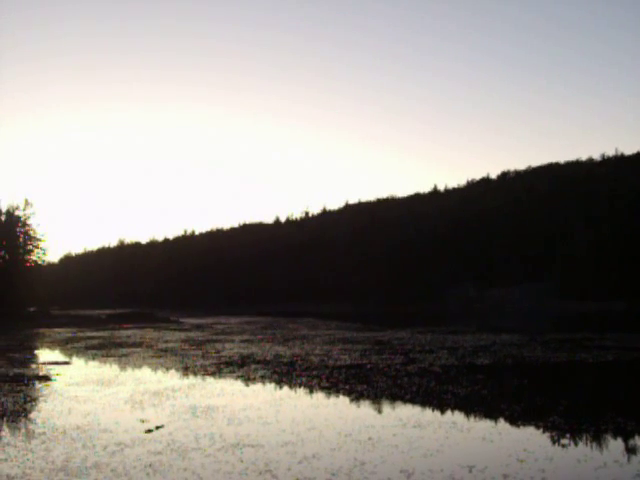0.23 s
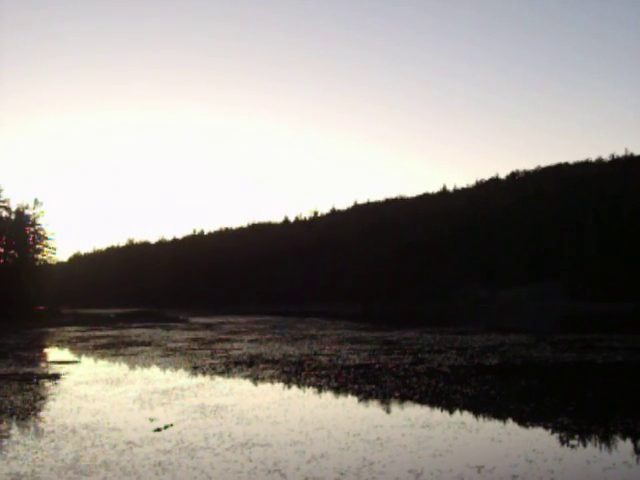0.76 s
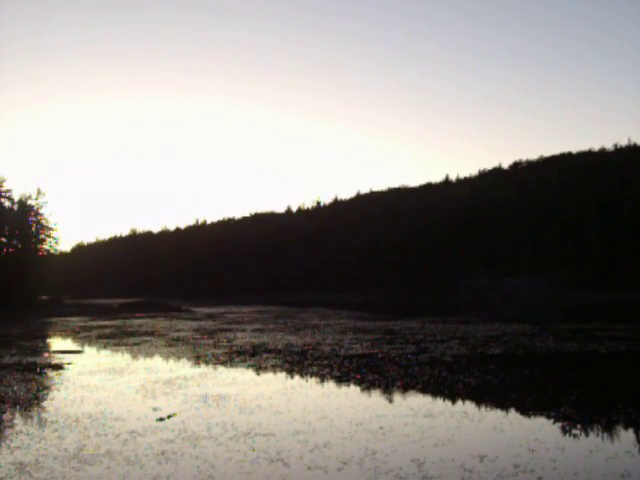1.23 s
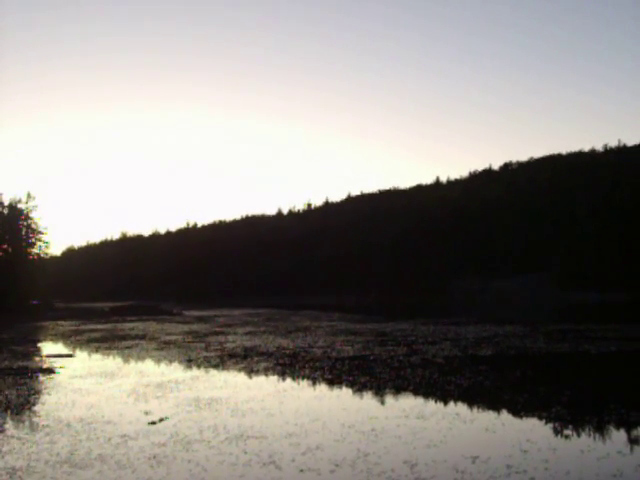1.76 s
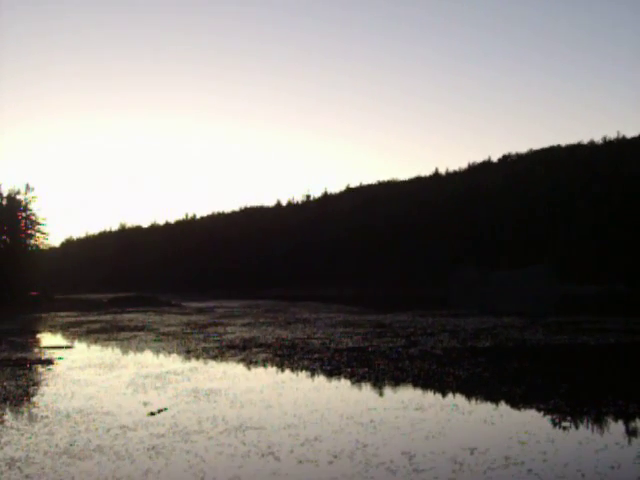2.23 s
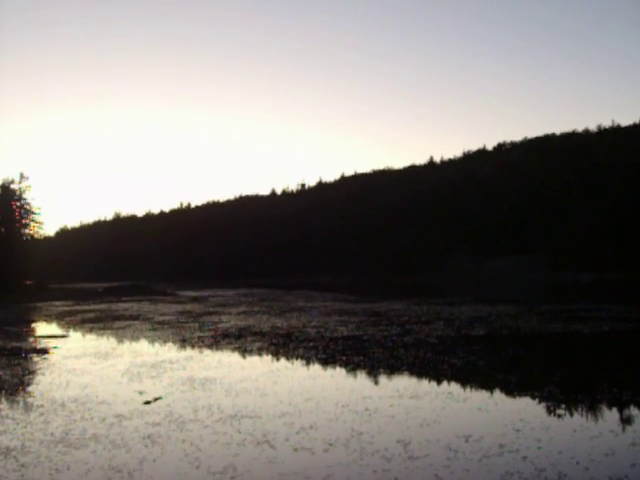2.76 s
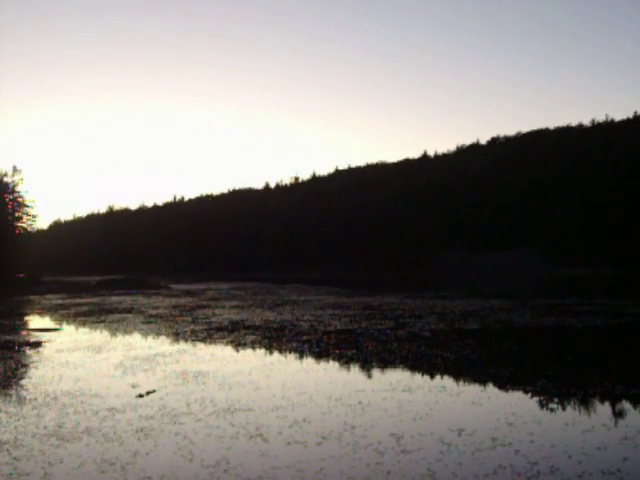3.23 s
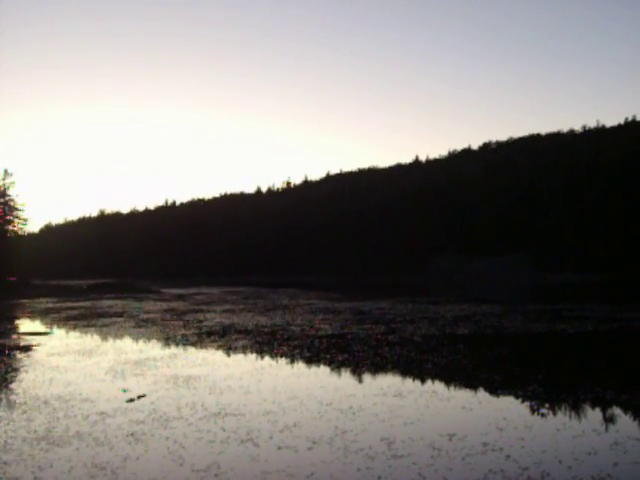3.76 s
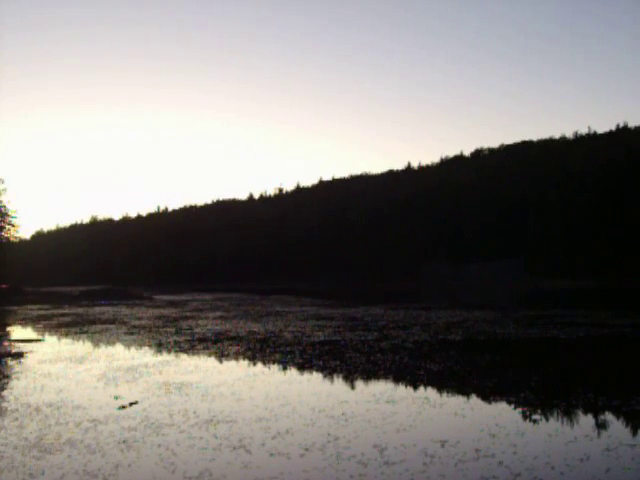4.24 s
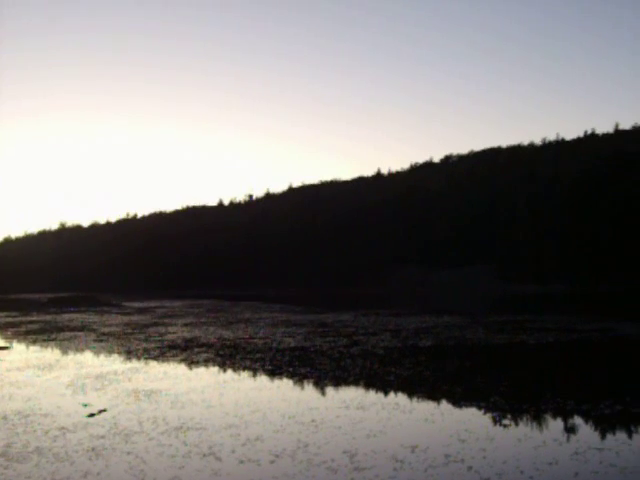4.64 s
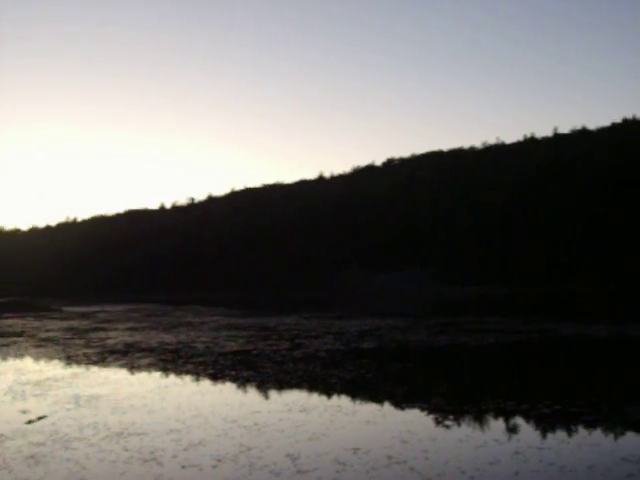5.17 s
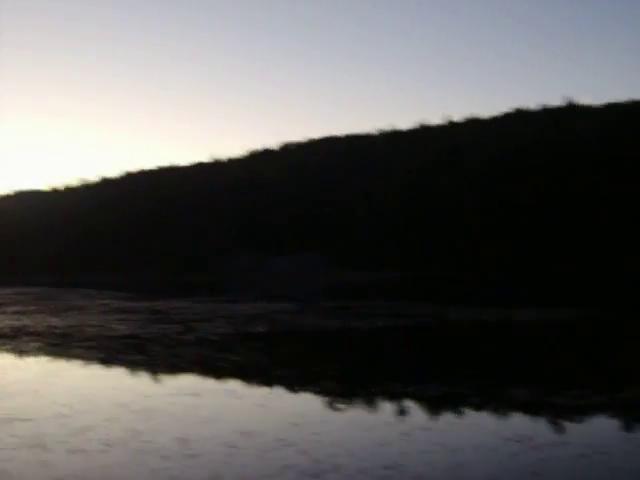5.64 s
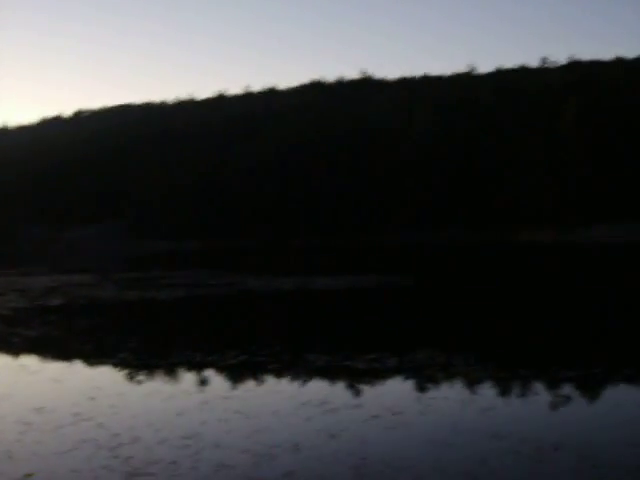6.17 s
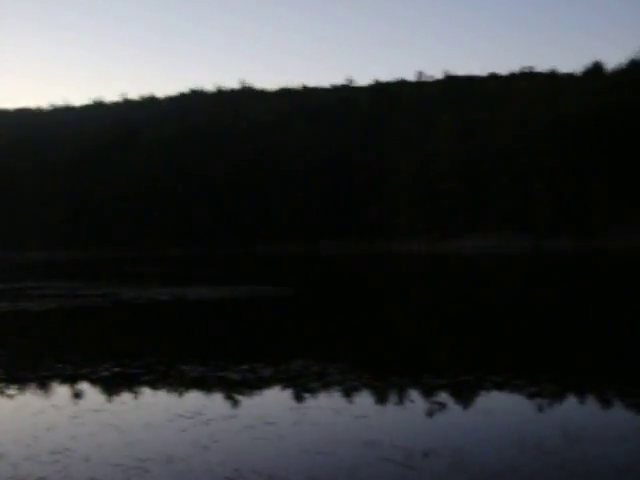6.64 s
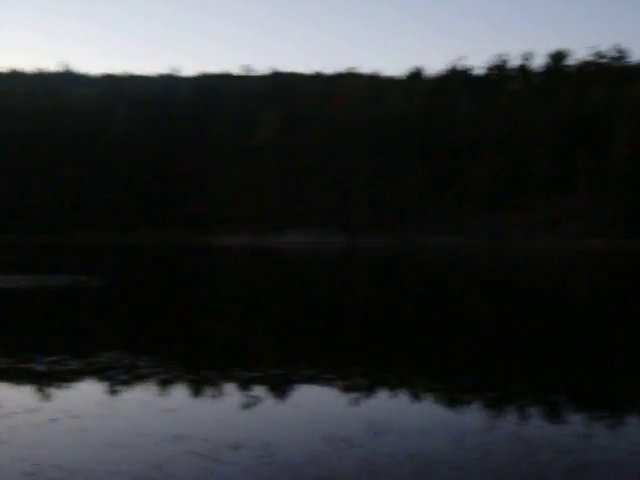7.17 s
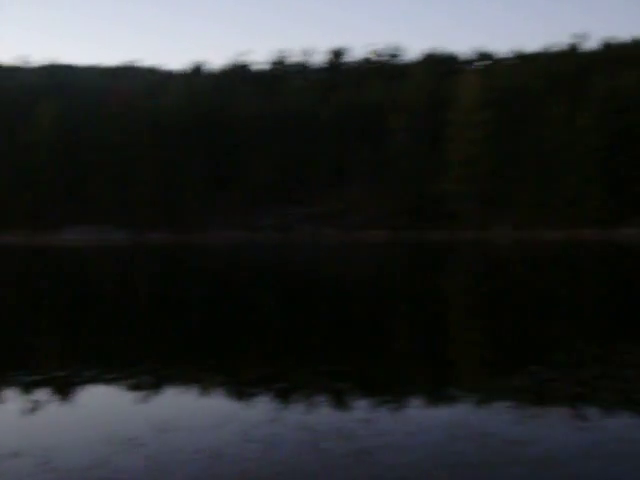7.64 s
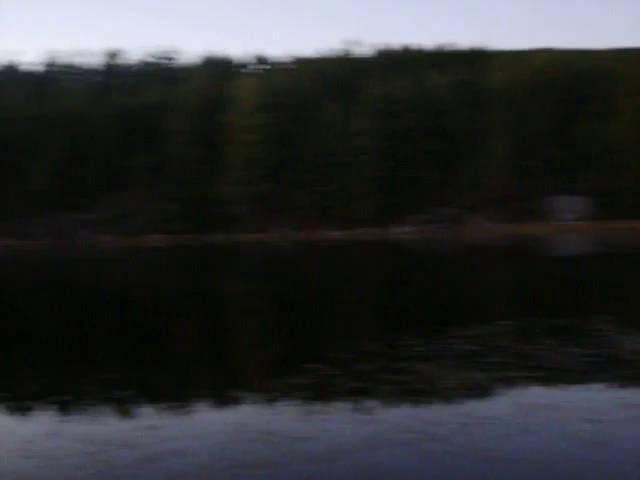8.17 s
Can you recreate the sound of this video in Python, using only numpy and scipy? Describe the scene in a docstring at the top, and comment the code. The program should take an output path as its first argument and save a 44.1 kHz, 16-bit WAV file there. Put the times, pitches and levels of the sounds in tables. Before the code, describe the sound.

Crickets trill and chirp steadily beside a pond at dusk, over a soft wash of air. At the start a faint, far coyote holds one wavering note that fades away. The strap of a hand-held camera snaps and knocks sharply on the case, right at the microphone, now and then at first and more often in the second half. A sleeve rustles softly near the end as the nearest cricket gets quieter.

```python
"""Crickets trill and chirp at a pond at dusk; each wing stroke is a short falling tone.
A far coyote howl fades out beneath them, over a soft wash of evening air.
The strap of a hand-held camera snaps and knocks on the case, ringing its modes.
A sleeve rustles as the camera turns away from the nearest cricket."""
import sys
import numpy as np
from scipy import signal
from scipy.fft import rfft, irfft
from scipy.io import wavfile

SR = 44100
rng = np.random.default_rng(int(sys.argv[2]) if len(sys.argv) > 2 else 0)


def dump(signal):
    """Clip the signal to [-1, 1] and save it as 16-bit WAV at the path in sys.argv[1]."""
    limited = np.clip(np.atleast_2d(signal).T, -1, 1)
    pcm = np.round(limited * 32767).astype(np.int16)
    wavfile.write(sys.argv[1], SR, pcm)


N = 369999

# evening air spectrum (frequency [Hz], relative density [dB])
AIR_SPECTRUM = [(20, -9.5), (50, -9.5), (90, -2), (115, 0), (200, -1.5), (320, -1), (500, -3.5),
                (900, -6.5), (1700, -11.5), (2600, -10), (3400, -12), (5400, -15)]
# far howl (time [s], pitch [Hz], level [dB])
HOWL = [(0, 780, -47), (.2, 780, -54), (1.3, 786, -58), (2.0, 775, -60.5), (2.9, 766, -67)]
# lower note under the howl (time [s], pitch [Hz], level [dB])
HOWL_LOW = [(0, 759, -51), (.3, 756, -58), (.55, 758, -57), (1.4, 752, -69)]
# sleeve rustles (centre [s], length [s], level [dB], centre [Hz], width [oct])
RUSTLES = [(5.3, .5, -47.5, 330, 0.24), (6.481, 0.068, -43.5, 900, 1.1), (6.545, 0.075, -37.5, 1040, 0.5),
           (6.85, 0.89, -46, 557, 1.43), (6.979, 0.49, -45, 4400, 0.47), (7.111, 0.18, -42.5, 940, 0.51),
           (7.119, 0.13, -39, 3500, 0.64), (7.44, .08, -39, 850, 0.71), (7.701, 0.69, -51.5, 420, 0.55)]
# sharp strap snaps (time [s], peak [dB], tilt [dB/oct])
SNAPS = [(0.5705, -21, -4), (1.0314, -24, 11), (1.404, -11.5, -2), (1.4077, -4.5, -0.5), (1.4554, -23.5, 1),
         (1.8123, -1, -2), (1.884, -21, 8), (3.863, -15.5, 0), (5.1131, -3, 1), (5.7433, -6.5, 2.5),
         (6.1436, -9.5, 5), (6.1463, -15.5, 8), (6.5722, -12.5, 6), (6.873, -22, 2), (7.245, -21.5, 14),
         (7.6355, -19, 25), (7.8509, -2.5, -1.5), (8.1067, -21, 20), (8.341, -8, 2.5)]
# duller toggle knocks (time [s], peak [dB], tilt [dB/oct])
KNOCKS = [(2.2954, -24.5, -4), (3.4880, -14.5, -3.5), (3.5143, -23, -2), (3.6219, -17, -2.5),
          (5.7631, -9, -0.5), (6.2428, 0, 1), (6.258, -24, -7), (6.4905, -29, -2), (6.6096, 0.5, 1.5),
          (6.617, -13, -5), (6.6216, -15, 2), (7.2683, -10, 1)]
# clinks of the strap's metal ring (time [s], peak [dB])
CLINKS = [(6.1433, -22), (6.5723, -34)]
# modes rung by each kind of blow (frequency [Hz], relative level [dB], t60 [s])
SNAP_MODES = [(940, -3.5, 0.0025), (2290, -14, 0.009), (2680, -11, 0.015), (2990, -7.5, 0.013),
              (3550, -3.5, 0.0083), (3980, -3.5, 0.0096), (4183, -4.5, 0.0096), (4690, -12, 0.0067),
              (5170, -23.5, 0.0072)]
KNOCK_MODES = [(627, -25, 0.013), (1040, -10.5, 0.013), (1272, -10.5, 0.018), (1820, -6, 0.019),
               (1950, -1.5, 0.014), (2460, -3.5, 0.012), (2665, -17.5, 0.085), (2800, -10, 0.019),
               (3640, -14, 0.016), (4140, -8.5, 0.01)]
CLINK_MODES = [(2595, -6, .2), (3505, -17, .14), (5483, 0, .2)]
# far insect chorus spectrum (frequency [Hz], relative density [dB])
CHORUS_SPECTRUM = [(3200, -33.5), (3750, -6), (4100, -5), (4450, -13.5), (4750, -4.5), (5100, -11),
                   (5500, -15)]
# second cricket's chirps (last stroke [s], peak [dB])
CHIRPS = [(1.175, -40), (1.561, -38), (2.072, -36), (2.726, -35), (3.449, -41.5), (3.985, -39),
          (4.321, -41), (4.79, -34), (5.291, -34), (5.711, -35), (6.134, -34), (6.462, -39.5), (7.456, -39),
          (7.88, -33.5)]
# nearest cricket's fresh starts (time [s])
TRILL_STARTS_S = [-.060, .981, 1.283, 1.388, 1.663, 1.941, 2.674, 3.106, 5.054, 5.632, 6.063, 6.19]
# its level, falling as the camera turns away (time [s], peak [dB])
TRILL_LEVEL = [(0, -36.5), (1.1, -35.5), (3.7, -36), (5.5, -38), (5.9, -41), (6.6, -43.5), (8.4, -45)]
# camera treble roll-off (frequency [Hz], gain [dB])
ROLL_OFF = [(4300, 0.5), (4900, -3.5), (5500, -4), (6100, -16), (6500, -24), (6900, -36.5), (7300, -60)]


def gain_of(db):
    """Decibels to amplitude."""
    return 10 ** (np.asarray(db) / 20)


def unit_rms(x):
    """Scales to rms 1."""
    return x / np.sqrt(np.mean(x ** 2) + 1e-20)


def add(mix, start_s, sound):
    """Mixes a sound in at start_s."""
    part = mix[max(round(start_s * SR), 0):][:len(sound)]
    part += sound[:len(part)]


def coloured(x, spectrum):
    """Filters by (frequency [Hz], gain [dB]) points."""
    points_hz, db = np.transpose(spectrum)
    hz = np.fft.rfftfreq(len(x), 1 / SR)
    return irfft(rfft(x) * gain_of(np.interp(np.log(hz + 1), np.log(points_hz), db)), len(x))


def drift(rate_hz):
    """Low-passed random wander, rms 1."""
    hz = np.fft.rfftfreq(N, 1 / SR)
    lowpass = np.exp(-(hz / rate_hz) ** 2) * (hz > 0)
    return unit_rms(irfft(rfft(rng.standard_normal(N)) * lowpass, N))


def scattered(x, t60_s, wet_db):
    """Adds reflections from reeds and trees."""
    t = np.arange(SR // 2) / SR
    tail = rng.standard_normal(len(t)) * gain_of(-60 * t / t60_s) * (t > .004)
    return x + gain_of(wet_db) * signal.fftconvolve(x, tail / np.linalg.norm(tail))[:N]


def air(level_db=-40.5, lumps_db=1.5):
    """Soft wash from the woods: lumpy bass, even hiss."""
    wash = unit_rms(coloured(rng.standard_normal(N), AIR_SPECTRUM))
    bass = signal.sosfiltfilt(signal.butter(2, 500, fs=SR, output="sos"), wash)
    hiss = wash - bass
    return gain_of(level_db) * (hiss + bass * gain_of(lumps_db * drift(8.8)))


def howl(contour, waver=.005, fading_db=2):
    """Far coyote: only the fundamental arrives, wavering, smeared by the hillside."""
    t = np.arange(N) / SR
    times_s, hz, db = np.transpose(contour)
    pitch_hz = np.interp(t, times_s, hz) * (1 + waver * drift(13))
    level = gain_of(np.interp(t, times_s, db, right=-120) + fading_db * drift(6))
    tone = level * np.sin(2 * np.pi * np.cumsum(pitch_hz) / SR)
    return scattered(tone, t60_s=1.2, wet_db=-3)


def sleeve(grain_db=2.5):
    """Brushing cloth: grainy swells of band noise."""
    out = np.zeros(N)
    grain = gain_of(grain_db * drift(120))
    for centre_s, length_s, db, centre_hz, width_oct in RUSTLES:
        size = round(length_s * SR)
        offset_oct = np.log2((np.fft.rfftfreq(size, 1 / SR) + 1) / centre_hz)
        band = np.exp(-(offset_oct / width_oct) ** 2 / 2)
        brush = irfft(rfft(rng.standard_normal(size)) * band, size)
        add(out, centre_s - length_s / 2, gain_of(db) * unit_rms(brush) * np.hanning(size))
    return out * grain


def blow(modes, tilt_db_oct, detune, grit):
    """Struck object: decaying modes of peak 1, plus contact noise."""
    t = np.arange(SR // 4) / SR
    ringing = np.zeros(len(t))
    for hz, db, t60_s in modes:
        cycles = hz * (1 + detune * rng.standard_normal()) * t + rng.random()
        envelope = gain_of(db + tilt_db_oct * np.log2(hz) - 60 * t / t60_s)
        ringing += envelope * np.sin(2 * np.pi * cycles)
    ringing *= 1 - np.exp(-t / 0.00025)
    contact = grit * rng.standard_normal(len(t)) * np.exp(-t / 0.0083)
    return ringing / abs(ringing).max() + contact


def strap(thump_above_db=-5.5, thump_gain_db=-12, thump_rise_s=0.000097, thump_decay_s=0.0073):
    """Strap, ring and toggle hit the case; the hardest snaps also thump the microphone."""
    t = np.arange(SR // 4) / SR
    push = np.exp(-t / thump_rise_s) - np.exp(-t / thump_decay_s)
    case, thumps = np.zeros(N), np.zeros(N)
    for time_s, db, tilt_db_oct in SNAPS:
        add(case, time_s, gain_of(db) * blow(SNAP_MODES, tilt_db_oct, detune=0.0056, grit=0.031))
        if db > thump_above_db:
            add(thumps, time_s, gain_of(db + thump_gain_db) * push)
    for time_s, db in CLINKS:
        add(case, time_s, gain_of(db) * blow(CLINK_MODES, tilt_db_oct=0, detune=0, grit=0))
    for time_s, db, tilt_db_oct in KNOCKS:
        add(case, time_s, gain_of(db) * blow(KNOCK_MODES, tilt_db_oct, detune=0.0087, grit=0.052))
    return scattered(case, t60_s=0.078, wet_db=-23) + thumps


def wing_stroke(length_s, top_hz, fall_hz, bend):
    """One wing closure: swells late; pitch falls as the file slows."""
    progress = np.linspace(0, 1, round(length_s * SR))
    hz = top_hz * (1 + 0.0061 * rng.standard_normal()) - fall_hz * progress ** bend
    envelope = abs(np.sin(np.pi * progress ** 1.44)) ** 0.67
    return envelope * np.sin(2 * np.pi * (np.cumsum(hz) / SR + rng.random()))


def trill_times(start_s, gap_s):
    """Stroke times of a trill that skips about every sixth beat."""
    beats = np.where(np.arange(400) % 5 == 4, 2.1, 1) + .04 * rng.standard_normal(400)
    times_s = start_s + gap_s * np.cumsum(beats)
    return times_s[times_s < N / SR]


def far_crickets(trill_db=-51, chorus_db=-46, flutter_db=0.96, count=5):
    """Several trillers along the shore; countless others merge into hiss."""
    trills = np.zeros(N)
    for slowness, pitch, lag in rng.uniform(-1, 1, (count, 3)):
        for time_s in trill_times(start_s=.02 * lag, gap_s=.027 * (1 + .15 * slowness)):
            add(trills, time_s, wing_stroke(0.01304, top_hz=4600 + 200 * pitch, fall_hz=700, bend=1.506))
    chorus = unit_rms(coloured(rng.standard_normal(N), CHORUS_SPECTRUM))
    chorus *= gain_of(flutter_db * drift(25))
    trills = unit_rms(scattered(trills, t60_s=0.33, wet_db=-10.5))
    return gain_of(trill_db) * trills + gain_of(chorus_db) * chorus


def chirping_cricket(strokes=3, gap_s=.039, growth_db_per_s=22):
    """Second cricket: short groups of longer, higher strokes, growing in level."""
    out = np.zeros(N)
    for last_s, db in CHIRPS:
        for early_s in gap_s * np.arange(strokes):
            stroke = wing_stroke(.024, top_hz=5010, fall_hz=520, bend=1.7)
            add(out, last_s - early_s - .011, gain_of(db - growth_db_per_s * early_s) * stroke)
    return scattered(out, t60_s=0.22, wet_db=-11)


def near_cricket(run_s=.1518, strokes=5, gap_s=.0249, rest_s=.04, uneven_db=0.76, jitter_s=.0007):
    """Trill: runs of fast strokes, a skipped beat between runs, a rest before each fresh start."""
    out = np.zeros(N)
    for start_s, end_s in zip(TRILL_STARTS_S, TRILL_STARTS_S[1:] + [N / SR]):
        runs_s = np.arange(start_s, end_s, run_s)
        times_s = (runs_s[:, None] + gap_s * np.arange(strokes)).ravel()
        for time_s in times_s[(times_s > 0) & (times_s < end_s - rest_s)]:
            force, lag = rng.standard_normal(2)
            db = np.interp(time_s, *np.transpose(TRILL_LEVEL)) + uneven_db * force
            stroke = wing_stroke(0.01294, top_hz=4680, fall_hz=1023, bend=2.03)
            add(out, time_s - .0075 + jitter_s * lag, gain_of(db) * stroke)
    return scattered(out, t60_s=.15, wet_db=-23.5)


def scene():
    """Mono sum at the microphone."""
    crickets = near_cricket() + chirping_cricket() + far_crickets()
    return (air() + crickets + howl(HOWL) + howl(HOWL_LOW) + strap() + sleeve())[None]


def record(dry):
    """Camera: rounds hard peaks; quarter-rate sampling mirrors the treble above 5.5 kHz."""
    ceiling, band_hz, edge_hz = .72, 5600, 7480
    rounded = ceiling * np.tanh(dry[0] / ceiling)
    narrow = signal.fftconvolve(rounded, signal.firwin(101, band_hz, fs=SR), "same")
    sampled = 4 * narrow * (np.arange(N) % 4 == 0)
    soft = coloured(sampled, ROLL_OFF)
    edge_lowpass = signal.firwin(511, edge_hz, window=("kaiser", 9), fs=SR)
    return signal.fftconvolve(soft, edge_lowpass, "same")[None]


dry = scene()
out = record(dry)
dump(out)
```